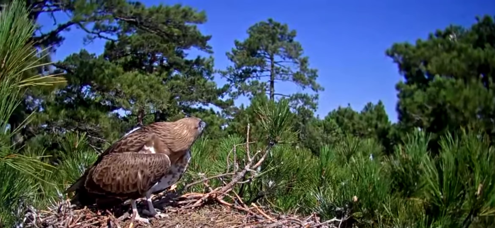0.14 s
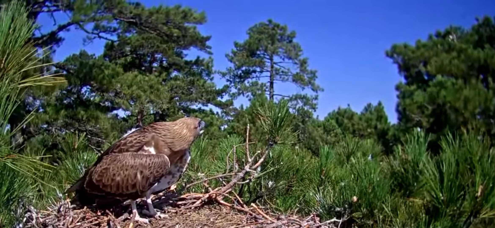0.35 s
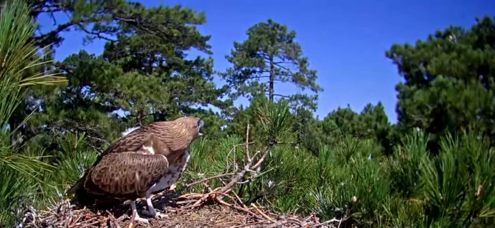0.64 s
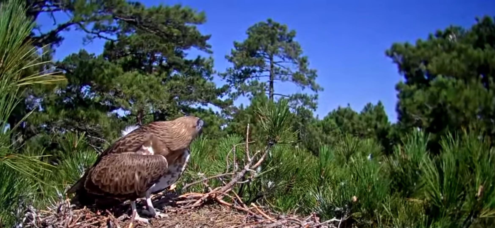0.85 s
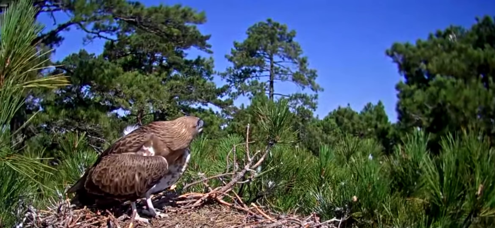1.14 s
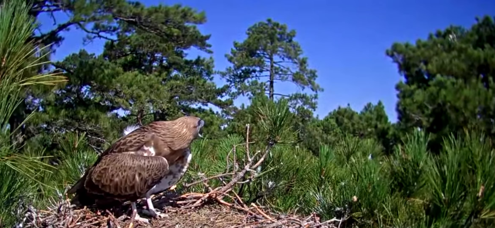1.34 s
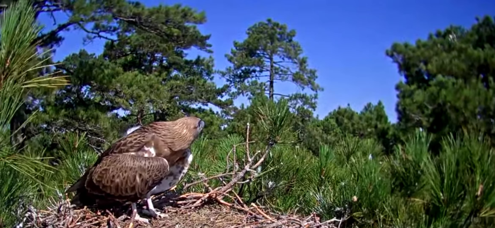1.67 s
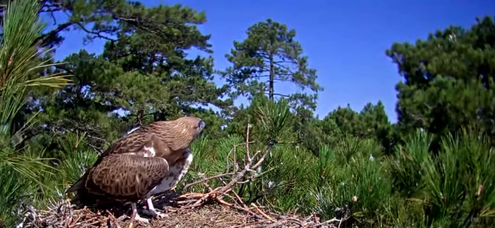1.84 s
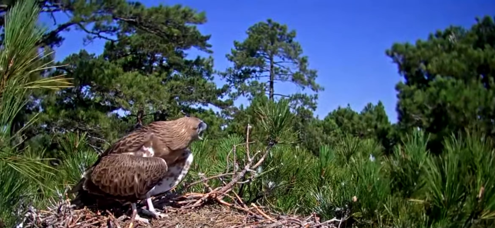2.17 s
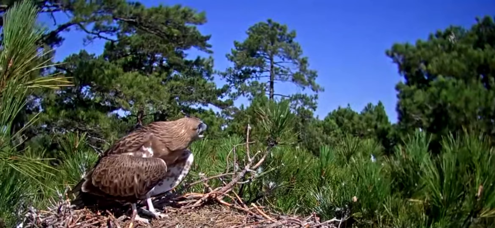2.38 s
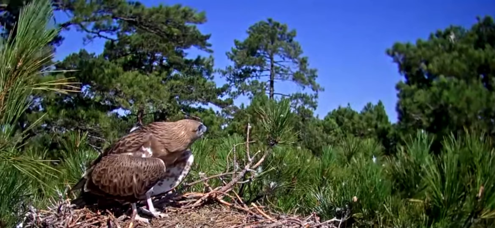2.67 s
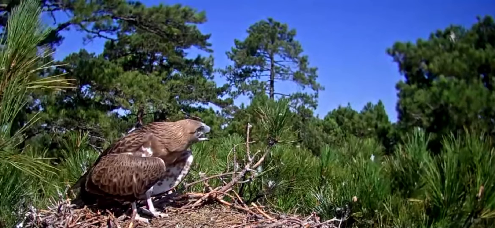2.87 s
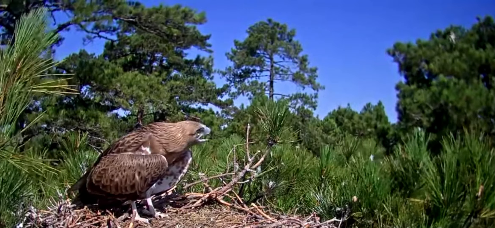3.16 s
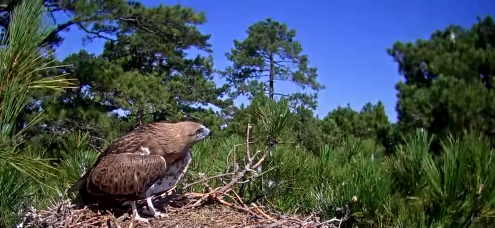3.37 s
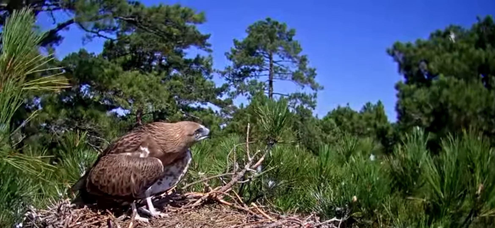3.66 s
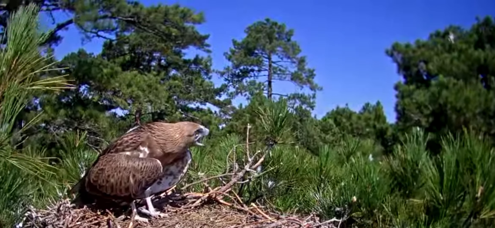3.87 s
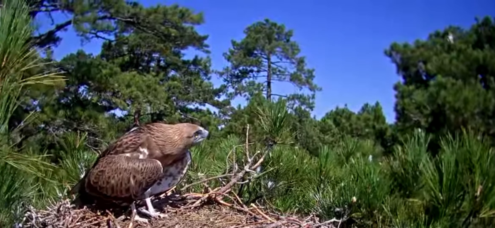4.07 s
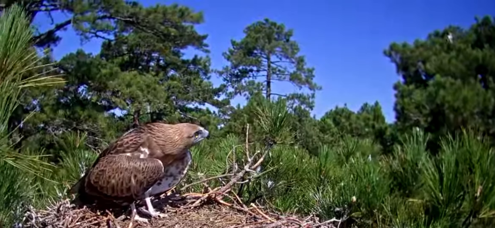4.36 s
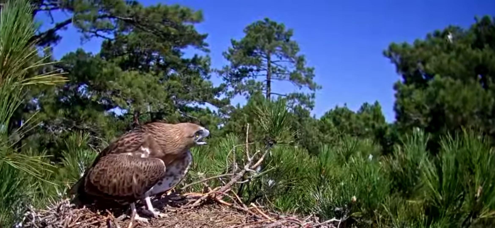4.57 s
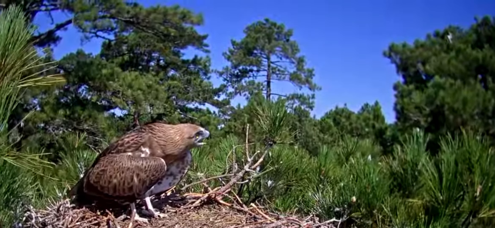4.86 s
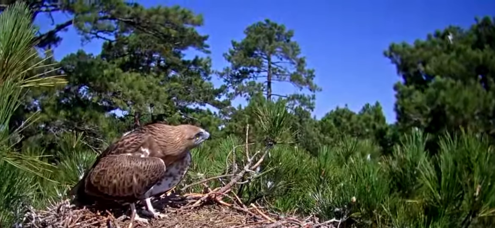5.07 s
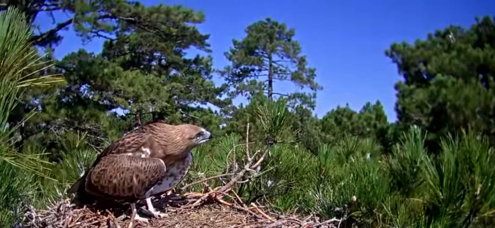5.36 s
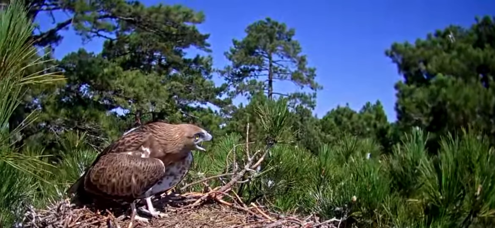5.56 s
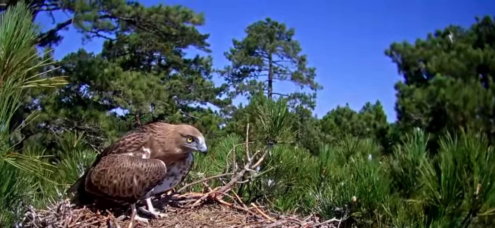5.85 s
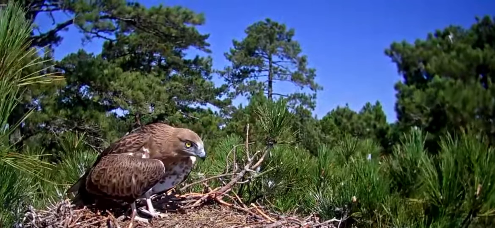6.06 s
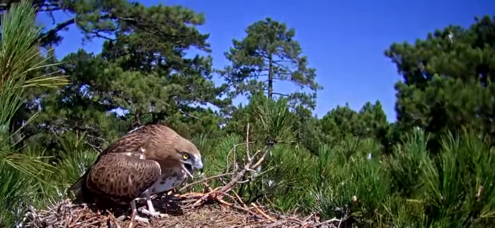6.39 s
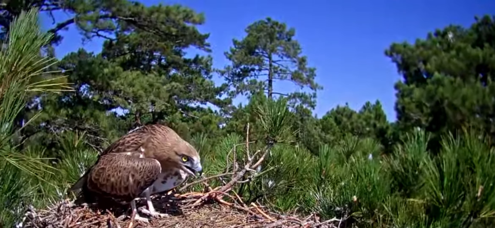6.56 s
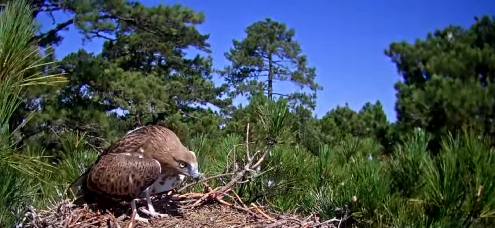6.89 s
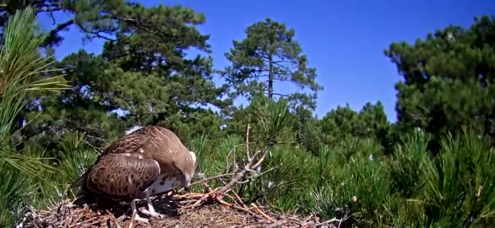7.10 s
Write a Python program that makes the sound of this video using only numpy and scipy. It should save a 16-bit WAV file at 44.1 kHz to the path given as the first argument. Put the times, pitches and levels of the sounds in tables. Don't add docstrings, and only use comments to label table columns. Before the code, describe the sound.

A young raptor on a tree-top nest begs with nine shrill screams, close to a small microphone. Most open with a tiny rising chirp and a raspy high whistle, then a strong held note that breaks into a lower, rougher falling cry. Low wind gusts thump the microphone between and beneath calls, and the pine forest returns a faint echo over a soft hush.

```python
import sys
import numpy as np
from scipy import signal
from scipy.io import wavfile
from scipy.ndimage import uniform_filter1d

SR = 44100
rng = np.random.default_rng(int(sys.argv[2]) if len(sys.argv) > 2 else 0)


def to_wav(sig):
    pcm = np.clip(np.atleast_2d(sig), -1, 1) * 32767
    pcm = np.round(pcm).astype(np.int16)
    wavfile.write(sys.argv[1], SR, pcm.T)


def boost(x):
    u = np.asarray(x, float) / 20
    return 10 ** u


N = 318843


def noise(size):
    return rng.standard_normal(size)


def band(x, lo_hz, hi_hz, order=2):
    y = signal.sosfilt(signal.butter(order, [lo_hz, hi_hz], "band", fs=SR, output="sos"), x)
    return y / np.sqrt(np.mean(y ** 2))


def walk(rate_hz, size):
    k = int(SR / rate_hz)
    once = uniform_filter1d(noise(size + 2 * k), k)
    y = uniform_filter1d(once, k)[k:k + size]
    return y * np.sqrt(1.5 * k)


def even(x, span_s):
    return x / np.sqrt(uniform_filter1d(x ** 2, int(span_s * SR)))


def read(rows, fade_s):
    s, *columns = np.transpose(rows)
    i = np.arange(max(int((s[0] - fade_s) * SR), 0), int((s[-1] + fade_s) * SR))
    t = i / SR
    inside = np.minimum(t - s[0], s[-1] - t)
    window = np.clip(inside / fade_s + 1, 0, 1) ** 2
    return i, window, [np.interp(t, s, c) for c in columns]


def spin(hz, wobble_hz, rate_hz):
    return np.exp(2j * np.pi * np.cumsum(hz + wobble_hz * walk(rate_hz, len(hz))) / SR)


def scream(hold, drop):
    low_rows = [(s, hz - gap, db + low) for s, hz, db, _, _, low, gap in hold]
    low_rows += [row[:3] for row in drop]
    i, window, (low_hz, low_db) = read(low_rows, .004)
    half = spin(low_hz / 2, 4, 220)
    low = half ** 2
    out = window * boost(low_db) * low

    j, window, (hz, db, octave_db, twelfth_db, share_db, _) = read(hold, .004)
    high = spin(hz, 1.4, 110)
    both = high + boost(share_db) * low[:len(j)]
    octave = np.exp(1j * 0.64) * high * (high + boost(7.5) * (both - high))
    sums = boost(twelfth_db) * both ** 3 - boost(octave_db) * octave
    below = signal.hilbert(band(noise(len(j)), 150, 800)).conj()
    carriers = boost(-52.5) * high ** 2 + boost(share_db - 30.0) * (high + high ** 2)
    breath = boost(2.0 * walk(36, len(j))) * below * carriers
    out[:len(j)] += window * boost(db) * (high + sums + breath)

    k, window, (_, db, octave_db, twelfth_db, half_db) = read(drop, .006)
    half, low = half[-len(k):], low[-len(k):]
    upper = boost(twelfth_db) * (low ** 3 - boost(-16) * low ** 4)
    upper = upper - boost(octave_db) * np.exp(1j * 0.91) * low ** 2
    between = boost(-10) * half + half ** 3 + boost(1.5) * half ** 5 + boost(-13.5) * half ** 7
    odd = boost(half_db - 0.5 + 4.4 * walk(400, len(k))) * between
    breath = boost(-26) * band(noise(len(k)), 2200, 5400, order=1)
    out[-len(k):] += window * boost(db) * (upper + odd + breath)
    return i, out


# (t/s, width/s, level lost/dB, pitch lost f/Hz)
CRACK = (1.735, 0.0044, 7.5, 20)


def held_course(start, end, hz, db, fade_db, over_hz, sag_hz, droop_hz, droop_s,
                octave_db, twelfth_db, quiet_db, lead_s, share_db, octave_fade_db, swell_db, fall_hz):
    crack_s, crack_width_s, crack_db, crack_hz = CRACK
    s = np.linspace(start, end, 160)
    since, left, part = s - start, end - s, (s - start) / (end - start)
    droop = droop_hz * np.exp(-left / droop_s)
    crack = np.exp(-((s - crack_s) / crack_width_s) ** 2)
    settle = np.exp(-since / 0.024)

    pitch = hz + 56.8 * np.exp(-since / 0.0044) + over_hz * settle
    pitch = pitch - sag_hz * part - droop - crack_hz * crack
    level = db - 18.5 * np.exp(-since / 0.0031)
    level = level - swell_db * np.exp(-since / 0.016) - fade_db * part
    level = level - 0.01 * droop - crack_db * crack
    level = level - 5 * np.exp(-left / 0.0048)

    def waver():
        return 2.5 * walk(2000, len(s))

    quiet = quiet_db + 2 * part + waver()
    swell = np.clip(1.3 * np.exp(-left / lead_s), 0, 1)
    share = quiet + (share_db - quiet) * swell + crack_db * crack
    break_hz = 99.1 + 0.32 * (fall_hz - 1665)
    last_gap = pitch[-1] - fall_hz - break_hz
    early_gap_hz = 320
    gap = early_gap_hz + (last_gap - early_gap_hz) * np.exp(-left / 0.03)
    octave = octave_db + octave_fade_db * (.5 - part) + waver()
    twelfth = twelfth_db - 9 * settle
    return list(zip(s, pitch, level, octave, twelfth, share, gap))


# (pitch f/Hz, level/dB, octave level/dB, twelfth level/dB, half-pitch level/dB)
SLACKENING = [(1430, -77, -12.5, -8.5, -23.5), (1494, -67.5, -6.5, -9.5, -12), (1586, -57, -5, -1, -20),
              (1705, -50.5, 2.5, -0.9, -14.5), (1782, -45, 1.5, 1.6, -23.5), (1872, -37.5, 0, -2.8, -31),
              (1961, -36, 2.5, 2, -17)]


def fall_course(start, end, first_hz, bend_s, arch_hz, db, octave_db, twelfth_db, opens_hz, half_db):
    last_hz = 1427
    s = np.linspace(start, end, 60)
    since = s - start
    bend = 1 - np.exp(-(end - s) / bend_s)
    arch = arch_hz * np.sin(np.pi * since / (end - start))
    pitch = last_hz + (first_hz - last_hz) * bend / bend[0] + arch
    hz, *colour = np.transpose(SLACKENING)
    level, octave, twelfth, half = (np.interp(pitch, hz, c) for c in colour)
    kick = 1.5 * np.exp(-since / 0.045)
    shut = 24.5 / (1 + np.exp((opens_hz - pitch) / 34.94))
    late = 15.5 * np.exp(-since / 0.0039)
    return list(zip(s, pitch, level + db + kick, octave + octave_db,
                    twelfth + twelfth_db - shut, half + half_db - late))


# (start t/s, end t/s, settled pitch f/Hz, level/dB, fade level/dB)
HELD_NOTES = [
    (-.012, 0.158, 2335, -33, 4),
    (0.8, 1.038, 2312, -31.5, 7.5),
    (1.608, 1.758, 2345, -34, 3),
    (2.495, 2.712, 2418, -34.5, 5.5),
    (3.29, 3.501, 2392, -32.5, 5),
    (4.107, 4.351, 2390, -32, 5),
    (4.976, 5.226, 2395, -32, 6.5),
    (5.873, 5.964, 2420, -31.5, 2),
    (6.701, 6.847, 2575, -31.5, 2.5),
]
# (overshoot f/Hz, slow sag f/Hz, last droop f/Hz, droop time t/s)
HELD_BENDS = [(100, 8, 58, 0.033), (110, -49.5, 205, .04), (97.9, 18.5, 4.4, 0.019), (58.5, 36, 130, 0.034),
              (99, -2, 78, 0.045), (120.37, -36, 200, .04), (104, -8.5, 215, 0.031),
              (70.2, -30.5, 100, .005), (124.6, 52, 80, .025)]
# (octave level/dB, twelfth level/dB, low voice's share level/dB, lead of its swell t/s,
# its share at the end level/dB)
HELD_COLOUR = [(-17.5, -50, -38.5, 0.033, -7), (-18.5, -40.5, -33, 0.0059, -8),
               (-15.5, -39, -40, 0.082, -7), (-14, -34.5, -39, 0.0085, -8.5),
               (-14.5, -35, -44.5, 0.056, -7), (-13.5, -38.5, -39.5, 0.007, -11.5),
               (-13, -35.5, -42.5, 0.0067, -14), (-14, -31, -42, 0.016, -1.8), (-12, -35.5, -36, 0.021, -2)]
OCTAVE_FADES = [4, 6.5, 7.5, -2.5, -2.5, 0, -2, 1, 0.5]
HELD_SWELLS = [2.8, 5.7, 2.2, .5, 2.8, 3, 2.5, 3.7, 5]
# (end t/s, first f/Hz, bend t/s, arch f/Hz, level change/dB)
LOW_FALLS = [(0.244, 1788, 0.045, 0.5, -1.5), (1.087, 1660, 0.05, -8.9, 0.5),
             (1.872, 1861, 0.058, -5.5, -2.5), (2.761, 1727, 0.074, 2, -3), (3.574, 1812, 0.038, -7.6, -1),
             (4.393, 1688, 0.045, -2.2, -2.4), (5.27, 1662, 0.049, -4.3, 0),
             (6.148, 1938, 0.037, 47, -1.24), (6.975, 1980, 0.044, -8, -2)]
# (octave level/dB, twelfth level/dB, pitch where twelfth opens f/Hz, half-pitch level/dB)
FALL_TINTS = [(0, -1, 1690, -0.5), (-2, -2, 1690, -4), (-1.5, 0.5, 1680, -3.5), (1, -1, 1720, 3),
              (-0.5, 3, 1740, 0.5), (2.5, 3.5, 1740, 5.5), (1.5, 1.7, 1790, -0.8), (-1.1, .5, 1800, -3.5),
              (2, 3, 1832, 1.7)]


def screams():
    break_s = .0065
    notes = []
    for held, bend, effort, fade_db, swell_db, fall, tint in zip(
            HELD_NOTES, HELD_BENDS, HELD_COLOUR, OCTAVE_FADES, HELD_SWELLS, LOW_FALLS, FALL_TINTS):
        hold = held_course(*held, *bend, *effort, fade_db, swell_db, fall[1])
        drop = fall_course(held[1] + break_s, *fall, *tint)
        notes.append(scream(hold, drop))
    return notes


# (f/Hz, level/dB)
RASP_TONES = [
    (2070, -2),
    (2450, -8),
]


def whistle(rows):
    i, window, (hz, db, rasp_db) = read(rows, .003)
    n = len(i)
    z = spin(hz, 7, 200)
    low, side = (boost(d + 3.5 * walk(300, n)) * spin(f + 0 * hz, 55, 300) for f, d in RASP_TONES)
    mixed = boost(-17.0) * low ** 2 + boost(-18.5) * z * low
    mixed = mixed + boost(-15.0) * z ** 2 * low.conj() + boost(-35.5) * z * low ** 2
    air = noise(n)
    hiss = boost(-15) * band(air, 4350, 5350, order=3)
    hiss = hiss + boost(-14.5) * band(air, 2200, 2800) + boost(-22) * band(air, 2900, 6000)
    late = np.clip(np.linspace(-.5, 1.5, n), 0, 1)
    octave = boost(-26.5) * boost(db + 44) * late * z ** 2
    tone = boost(db) * (z + octave)
    rasp = boost(rasp_db - 1.0) * (low + side + mixed + hiss)
    return i, window * (tone + rasp)


# (share of its length, pitch change f/Hz, level change/dB)
WHISTLE_ARC = [(0, 89.5, -19.5), (.13, -33.5, -6), (0.331, 3.5, -1.4), (0.851, -2.5, -0.4),
               (.92, -27, -4.5), (1.001, 62, -15)]


def whistle_course(start, end, hz, sag_hz, db, rasp_db, first, last, growth_db):
    part = np.linspace(0, 1, 60)
    at, bend, swell = np.transpose(WHISTLE_ARC)
    pitch = hz - sag_hz * part + np.interp(part, at, bend)
    level = db + np.interp(part, at, swell) - growth_db * (1 - part)
    outside = np.maximum(np.maximum(first - part, part - last), 0)
    rasp = rasp_db - 121 * outside
    return list(zip(start + part * (end - start), pitch, level, rasp))


# (start t/s, end t/s, pitch f/Hz, sag f/Hz, level/dB)
WHISTLES = [
    (0.73, .805, 3260, 52, -41.5),
    (1.541, 1.614, 3280, 89, -42.5),
    (2.412, 2.498, 3315, 87, -42),
    (3.232, 3.239, 3304, 1, -50.5),
    (3.247, 3.292, 3340, 103, -42),
    (4.038, 4.111, 3377, 118, -41.5),
    (4.904, 4.981, 3378, 75, -41.5),
    (5.787, 5.879, 3340, 51, -42),
    (6.656, 6.705, 3492, 30, -37),
]
# (level/dB, from share of the whistle, to share, growth of the whistle level/dB)
WHISTLE_RATTLES = [(-53, 0.27, 0.76, 6.5), (-55.5, 0.34, 0.81, 8.5), (-54, .3, 0.83, 3.5),
                   (-80, 0.36, .7, 3.5), (-51.5, 0.22, 0.8, -3), (-52.5, .3, .84, 2), (-54, .35, .85, 1),
                   (-58, 0.23, 0.91, 2), (-70.5, .15, .8, 4)]


def whistles():
    return [whistle(whistle_course(*row, *rattle)) for row, rattle in zip(WHISTLES, WHISTLE_RATTLES)]


# (start t/s, end t/s, first f/Hz, last f/Hz, level/dB)
OPENING_CHIRPS = [
    (0.688, 0.718, 1530, 1996, -61),
    (1.509, 1.536, 1670, 1963, -56.5),
    (2.363, 2.431, 2380, 3340, -72.5),
    (4.005, 4.032, 1770, 2000, -53.5),
    (4.867, 4.899, 1632, 2090, -56),
    (5.754, 5.764, 1900, 1933, -73.5),
    (5.765, 5.798, 2532, 3130, -69.5),
    (6.613, 6.646, 1716, 2225, -49),
]


def chirps():
    notes = []
    for start, end, first_hz, last_hz, db in OPENING_CHIRPS:
        octave_db = -1 + 1.3 * min(db + 63, 0)
        i, _, (hz, part) = read([(start, first_hz, 0), (end, last_hz, 1)], 1e-4)
        z = spin(hz, 3.2, 200)
        tone = z + boost(octave_db) * (z ** 2 + boost(-13.0) * z ** 3 + boost(-25.5) * z ** 4)
        notes.append((i, boost(db) * np.sin(np.pi * part ** 1.2) ** 3.1 * tone))
    return notes


def bird():
    out = np.zeros(N)
    for i, note in chirps() + whistles() + screams():
        out[i] += np.sqrt(2) * note.real
    return out


def forest(x):
    t = np.arange(2 * SR) / SR

    def tail(db, t60_s):
        return boost(db - 60 * t / t60_s) * np.sqrt(2 * np.log(1000) / t60_s / SR)

    onset = np.clip(t / 0.0089, 0, 1)
    trunks, branches = tail(-46.5, 1.8), tail(-41, .3)
    response = onset * (trunks + branches) * band(noise(len(t)), 2100, 4600, order=1)
    return signal.fftconvolve(x, response)[:N]


# (t/s, thump level/dB, width t/s, buffet level against the thump/dB)
WIND_GUSTS = [(0.249, -49, 0.17, -14), (0.501, -44.5, 0.015, -32), (0.798, -54, 0.28, -21.5),
              (1.202, -42, 0.042, -13.5), (1.31, -40, 0.1, -11), (1.51, -30, 0.068, -17),
              (1.749, -35.5, 0.11, -15.5), (2.051, -48, 0.026, -8.5), (2.269, -45.5, 0.29, -23.5),
              (2.62, -33.5, 0.044, -14), (3.09, -29, 0.049, -12.5), (3.248, -33.5, 0.11, -10.5),
              (3.519, -42, .12, 1.5), (3.81, -42, 0.15, -24.5), (4.152, -37, 0.031, -14.5),
              (4.29, -42, 0.031, -9), (4.411, -37, 0.052, -17.5), (4.73, -52, 0.044, -16),
              (5.32, -58.5, 0.065, -20), (5.68, -45, 0.053, -18.5), (6.25, -64, 0.45, -14.5),
              (6.828, -42, 0.06, -19.5), (7.001, -47, 0.11, -19), (7.225, -45.5, 0.018, -10)]


def wind():
    t = np.arange(0, N, 64) / SR
    s, thump_db, width_s, buffet_db = np.transpose(WIND_GUSTS)[:, :, None]

    def gusts(calm_db, peak_db, w):
        peaks = boost(2 * peak_db) * np.exp(-2 * np.abs(t - s) / w)
        level = np.sqrt(boost(2 * calm_db) + np.sum(peaks, axis=0))
        return np.interp(np.arange(N) / SR, t, level)

    thump = even(band(noise(N), 15, 50, order=3), .09)
    swirl = boost(1.5 * walk(20, N)) * noise(N)
    buffet = even(band(band(swirl, 40, 80, order=1), 30, 190), .09)
    thumps = gusts(-78.5, thump_db, width_s) * thump
    buffets = gusts(-79, thump_db + buffet_db, .7 * width_s) * buffet
    return thumps + buffets


# (f/Hz, level/dB per Hz)
HUSH_SPECTRUM = [(60, -17.5), (150, -16.5), (350, -7.5), (560, -11), (850, -16.5), (1300, -23),
                 (1900, -28.5), (3000, -33), (5600, -43), (7500, -55)]


def hush():
    out, swell = 0, walk(0.25, N)
    hz, db = np.transpose(HUSH_SPECTRUM)
    for f in 60 * 2 ** np.arange(0, 7, .5):
        here_db = np.interp(np.log(f * 0.89), np.log(hz), db) + 0.81 * swell + 1.0 * walk(4.1, N)
        out = out + boost(here_db) * np.sqrt(f) * band(noise(N), f, f * np.sqrt(2))
    return boost(-73.5) * out / np.sqrt(np.mean(out ** 2))


def scene():
    air = wind() + hush()
    voice = bird()
    return (voice + forest(voice) + air)[None]


def band_limit(x):
    return signal.sosfilt(signal.butter(12, 15700, fs=SR, output="sos"), x)


def record(dry):
    clip, limit = .0405, .0415
    slow = signal.resample_poly(dry, 160, 441, axis=1)
    slow = slow / (1 + np.abs(slow / clip) ** 20) ** (1 / 20)
    fast = signal.resample_poly(slow, 441, 160, axis=1)[:, :N]
    fast = signal.sosfiltfilt(signal.ellip(8, .2, 80, 7650, fs=SR, output="sos"), fast)
    hiss, offset = boost(-96.0) * noise(fast.shape), 0.001
    mix = np.clip(fast, -limit, limit) + hiss + offset
    return band_limit(mix)


dry = scene()
out = record(dry)
to_wav(out)
```